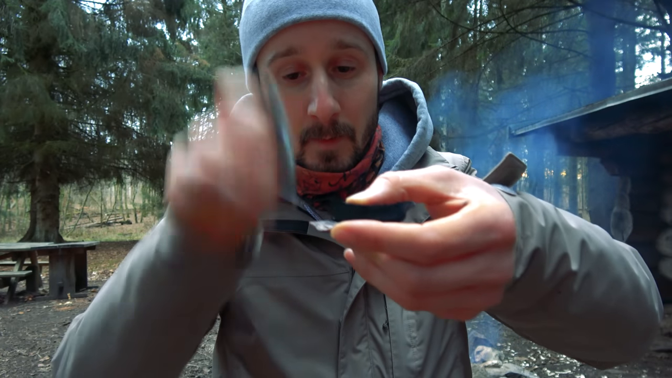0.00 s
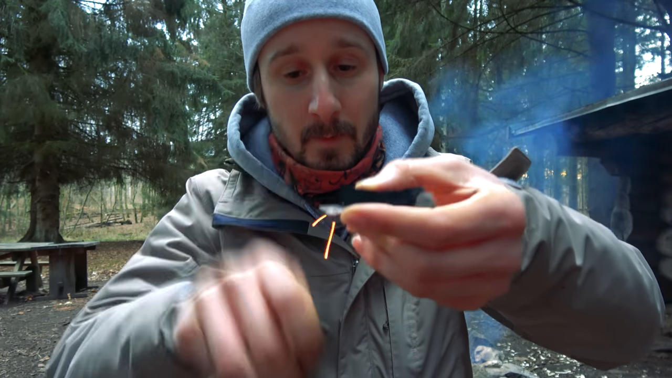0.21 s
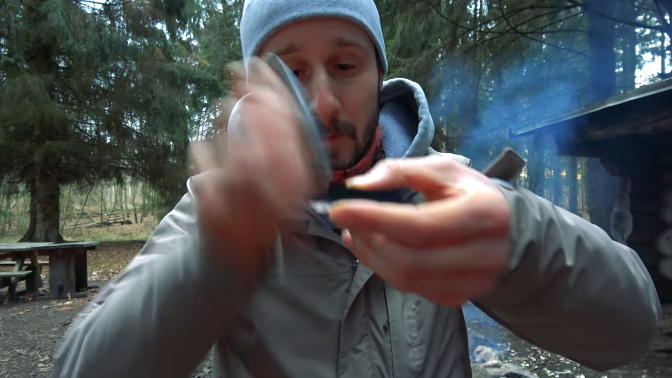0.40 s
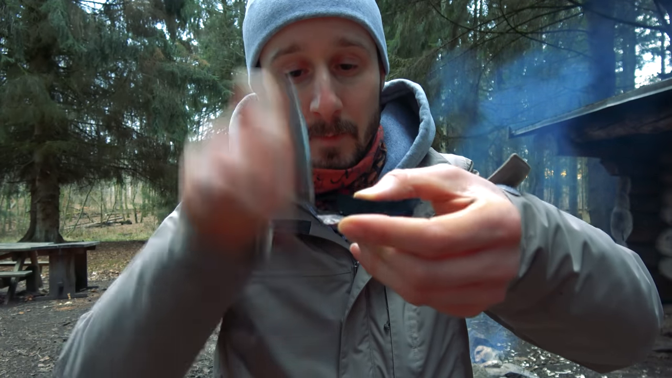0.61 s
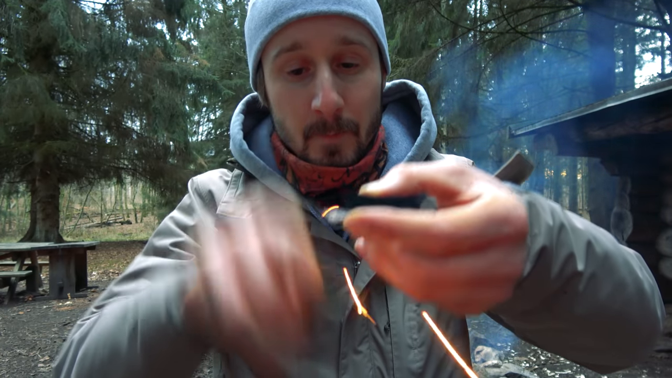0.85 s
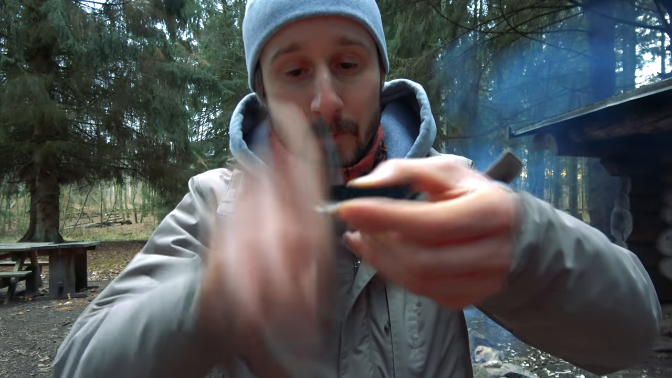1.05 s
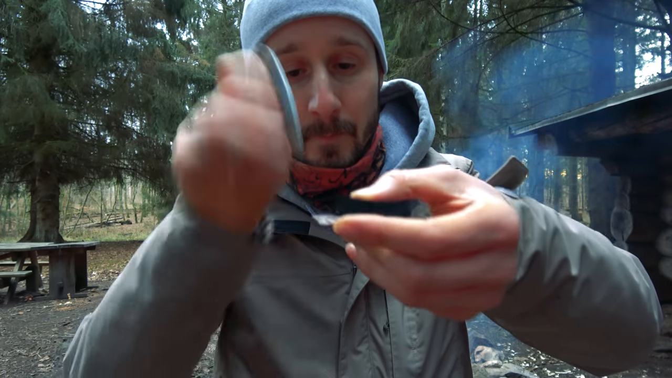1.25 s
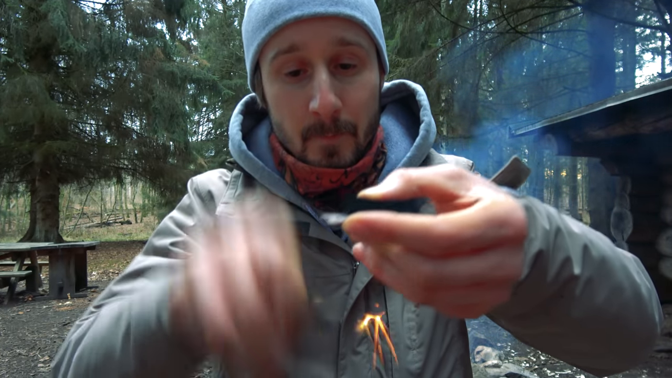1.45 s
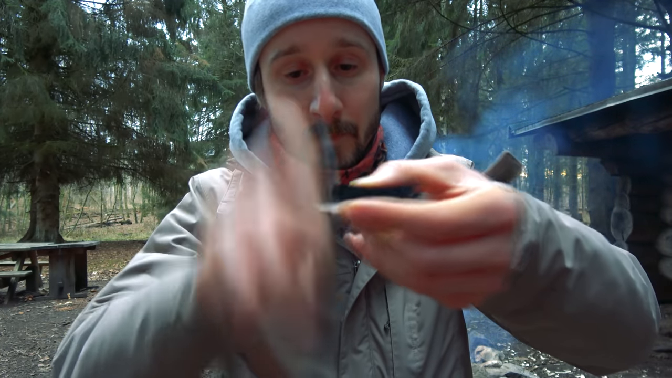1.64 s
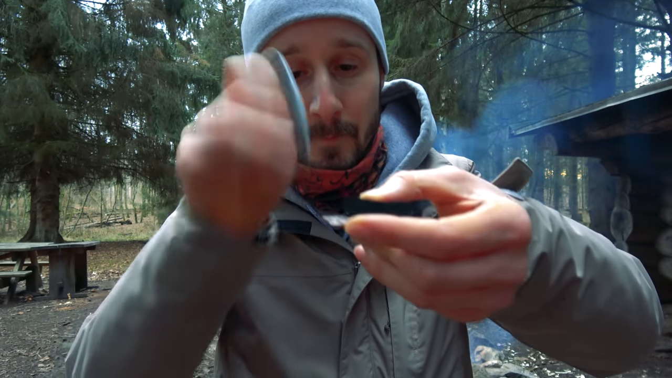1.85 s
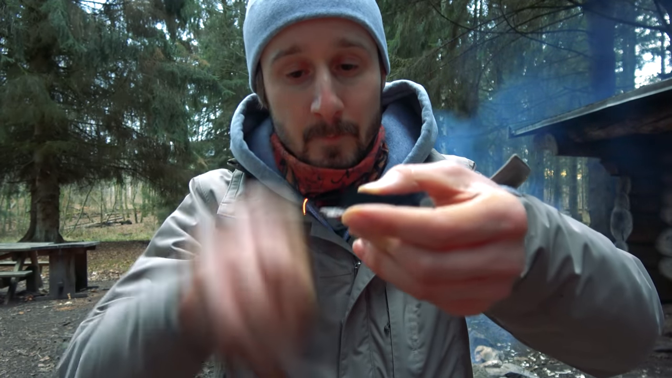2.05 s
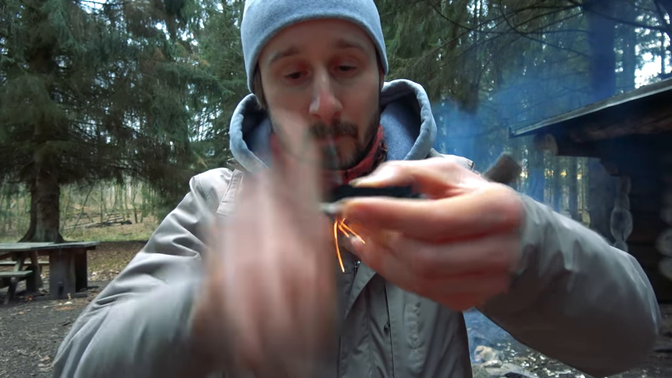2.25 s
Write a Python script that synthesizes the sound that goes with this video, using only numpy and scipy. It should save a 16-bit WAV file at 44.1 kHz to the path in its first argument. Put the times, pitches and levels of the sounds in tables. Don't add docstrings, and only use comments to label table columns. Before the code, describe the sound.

Close, dry, loud metal-on-stone strikes, about three per second, each a sharp knock running into a very short bright scrape; faint cloth swishes, light ticks, low wind on the microphone and soft forest hush behind.

```python
import sys
import numpy as np
from scipy import signal
from scipy.fft import rfft, irfft
from scipy.io import wavfile

SR = 44100
rng = np.random.default_rng(int(sys.argv[2]) if len(sys.argv) > 2 else 0)


def to_wav(s):
    ch = np.atleast_2d(s).T
    pcm = np.round(np.clip(ch, -1, 1) * 32767)
    wavfile.write(sys.argv[1], SR, pcm.astype(np.int16))


def linear_from_db(decibels):
    return 10 ** (np.asarray(decibels, float) / 20)


N = 101430


def rms_one(x):
    return x / np.sqrt(np.mean(x ** 2) + 1e-20)


def drift(rate_hz):
    pole = np.exp(-2 * np.pi * rate_hz / SR)
    walk = signal.lfilter([1], [1, -2 * pole, pole * pole], rng.standard_normal(N + SR))
    return rms_one(walk[SR:])


def ring(force, hz, t60_s):
    radius, angle = linear_from_db(-60 / (t60_s * SR)), 2 * np.pi * hz / SR
    return signal.lfilter([0, np.sin(angle)], [1, -2 * radius * np.cos(angle), radius * radius], force + 1e-18)


def coloured(spectrum):
    hz, db = np.transpose(spectrum)
    f = np.maximum(np.arange(N // 2 + 1) * SR / N, 1)
    gain = linear_from_db(np.interp(np.log(f), np.log(hz), db)) * np.minimum(f / hz[0], 1) ** 2
    return rms_one(irfft(rfft(rng.standard_normal(N)) * gain, N))


def band(x, order, low_hz, high_hz):
    return signal.sosfilt(signal.butter(order, [low_hz, high_hz], "band", fs=SR, output="sos"), x)


def impulses(times_s, gains):
    out = np.zeros(N)
    out[(np.asarray(times_s) * SR).astype(int)] = gains
    return out


def burst(t, start_s, fall_s, rise_s):
    return np.exp(np.where(t < start_s, (t - start_s) / rise_s, (start_s - t) / fall_s))


def swells(rows):
    t = np.arange(N) / SR
    return sum(linear_from_db(db) * np.exp(-((t - s) / half_s) ** 2) for s, half_s, db in rows)


# [pitch_hz, level_db per Hz]
HUSH_SPECTRUM = [(59, -30), (100, 3), (244, 0), (452, -6.5), (1010, -8), (2750, -19.5), (8110, -22),
                 (12700, -32), (16000, -30.5)]


def wood_hush():
    return linear_from_db(-51) * coloured(HUSH_SPECTRUM)


def wind():
    rumble = rms_one(band(rng.standard_normal(N), 2, 18, 124))
    return linear_from_db(-53.5 + 2.5 * drift(3.5)) * rumble


# [pitch_hz, level_db per Hz]
CLOTH_SPECTRUM = [(800, -4), (2500, 5), (5000, -0.5), (8400, 4), (9800, -8.5), (16000, 2)]
# [centre_s, half_length_s, level_db]
SLEEVE_SWISHES = [(.03, .015, -52.5), (.075, 0.012, -55.5), (.12, .02, -55.5), (.39, 0.034, -59),
                  (.455, 0.013, -51.5), (.97, 0.01, -54), (1.01, 0.016, -53.5), (1.07, .025, -59),
                  (1.35, .04, -62), (1.55, .012, -48.5), (1.95, .04, -61.5), (2.09, 0.005, -61),
                  (2.23, 0.022, -53)]


def jacket():
    patches = linear_from_db(2.5 * drift(60))
    return (linear_from_db(-71.5) + swells(SLEEVE_SWISHES)) * patches * coloured(CLOTH_SPECTRUM)


# [start_s, level_db, pitch_hz, decay_s]
CHIP_TICKS = [(0.0253, -30.5, 1600, 0.0018), (0.3295, -43, 2980, 0.0011), (0.38, -49, 8000, 0.0027),
              (0.392, -35, 2300, 0.0013), (0.6975, -38, 8500, 0.00043), (0.8116, -26, 502, 0.0026),
              (0.8177, -39.5, 3000, .001), (0.957, -47.5, 11000, 0.0014), (0.974, -49.5, 8000, 0.0013),
              (1, -35, 4800, 0.00058), (1.014, -40, 5980, 0.00067), (1.056, -48, 8000, 0.0026),
              (1.0884, -49, 6000, 0.0015), (1.548, -35, 2600, .003), (2.055, -30, 1985, 0.0004),
              (2.0895, -39, 2000, 0.0018), (2.1817, -23, 1320, 0.0022), (2.229, -50, 2500, 0.0073)]


def ticks():
    out, age = np.zeros(N + SR), np.arange(SR // 20) / SR
    spits = rng.standard_normal((len(CHIP_TICKS), len(age)))
    for (s, db, hz, decay_s), noise in zip(CHIP_TICKS, spits):
        noise = np.r_[-linear_from_db(12), noise[1:]]
        tone = rms_one(signal.lfilter(*signal.iirpeak(hz, 1.3, fs=SR), noise))
        out[int(s * SR):][:len(age)] += linear_from_db(db) * (tone + linear_from_db(-11) * noise) * np.exp(-age / decay_s)
    return out[:N]


STRIKE_TIMES = [.2158, .5179, .8223, 1.1212, 1.4209, 1.7230, 2.0198]
SCRAPE_LENGTHS = [.0255, .0215, .021, .0247, .0245, .0225, .0195]
# [knock_db, thud_db, scrape_db, knock_tilt_db per octave]
STROKE_LEVELS = [
    (-4.5, -10.5, -21, 4.5),
    (-8, -7, -22.5, -0.5),
    (-1, -6.5, -22.5, 4),
    (-4, -8, -21, 1),
    (-6.5, -8, -24, -1.5),
    (-13, -1.5, -22, -5),
    (-8, -6.5, -21, 0.5),
]
# [start_s, knock_db, tilt_db per octave]
UPWARD_BRUSH = (.6523, -20, -.8)
# [peak_s, level_db, pitch_hz]
EDGE_SNAGS = [(.2246, -9, 8000), (0.228, -12, 11000), (0.23, -10.5, 10000), (0.2326, -10, 10950),
              (.2381, -11, 9000), (0.238, -10, 8000), (0.5229, -6, 4070), (0.5268, -5.5, 9000),
              (.5305, -5.5, 11100), (0.5324, -10, 10000), (0.5384, -13, 11000), (0.541, -24, 2440),
              (0.8252, -11, 3500), (0.8298, -16, 6000), (0.8342, -15, 9000), (0.8415, -10, 4400),
              (1.1233, -5.5, 4000), (1.1298, -5.5, 5500), (1.1325, -16, 11000), (1.136, -7.5, 11000),
              (1.1444, -10, 3000), (1.4224, -13.5, 2600), (1.4268, -11.5, 12000), (1.4293, -2.5, 10800),
              (1.4444, -17, 1970), (1.7436, -13, 11040), (2.0243, -4, 4000), (0.2175, -9, 10940),
              (2.0363, -9.5, 3840), (2.0393, -26, 8000)]
# [pitch_hz, level_db, t60_s]
CONTACT_MODES = [(4047, 0, 0.0053), (4633, -3.5, 0.01), (5290, -3, .004), (7000, -3.5, .006),
                 (7246, -1.5, 0.0037), (7896, -2, 0.0054), (10710, -1, 0.0074), (11630, -4, 0.0048),
                 (12060, -7, 0.0065), (12450, -4.5, .004), (14880, -4, 0.0033), (15300, -9.5, .003),
                 (281, -18.5, 0.014), (520, -17, 0.0047), (770, -18.5, 0.018), (1138, -23, 0.0027),
               (1607, -3.5, 0.0068), (1953, -2.5, 0.009), (2710, -3, 0.0086), (3110, -4, 0.0099),
               (3640, -8.5, 0.0034), (6530, -7.5, 0.0027), (9000, -11, 0.0034)]


def scrape_envelope(t):
    force = np.zeros(N)
    for s, length_s, (_, _, db, _) in zip(STRIKE_TIMES, SCRAPE_LENGTHS, STROKE_LEVELS):
        landing = np.clip((t - s) / 0.0033, 0, 1)
        lift = np.exp(-np.maximum(t - s - length_s, 0) / 0.00091)
        force += linear_from_db(db) * landing * lift
    return force


def grit_impulses():
    met = rng.random(N) < 15000 / SR
    strength = linear_from_db(0.95 * np.minimum(rng.exponential(1, N), 4))
    return rms_one(met * strength * rng.choice([-1, 1], N))


def contacts():
    t = np.arange(N) / SR
    knocks = [(s, db, tilt) for s, (db, _, _, tilt) in zip(STRIKE_TIMES, STROKE_LEVELS)] + [UPWARD_BRUSH]
    scrape, grit, rub = scrape_envelope(t), grit_impulses(), rng.standard_normal(N)
    rub[[int(np.ceil(s * SR)) for s, _, _ in knocks]] = -linear_from_db(12)
    blows = np.array([burst(t, s, 0.00055, 1e-6) for s, _, _ in knocks])
    catches = np.array([burst(t, s, 0.00078, 0.00039) for s, _, _ in EDGE_SNAGS])
    _, knock_db, tilt_db = np.transpose(knocks)
    _, snag_db, snag_hz = np.transpose(EDGE_SNAGS)

    def drive(hz):
        octaves = np.log2(max(hz, 1500) / 5000)
        hits = linear_from_db(knock_db + tilt_db * octaves) @ blows
        hits = hits + linear_from_db(snag_db - 9 * np.log2(hz / snag_hz) ** 2) @ catches
        return (hits * rub + scrape * grit * linear_from_db(2.4 * octaves)) * linear_from_db(2.58 * drift(150))

    body = np.zeros(N)
    for k, (hz, db, t60_s) in enumerate(CONTACT_MODES):
        body += (-1) ** k * linear_from_db(db) * ring(drive(hz), hz, t60_s)
    crack = signal.sosfilt(signal.butter(1, 1200, "high", fs=SR, output="sos"), drive(6000))
    return linear_from_db(-15.5) * body, crack


def thuds():
    u = np.arange(SR // 200) / SR / 0.00015 - 1
    thud_db = np.transpose(STROKE_LEVELS)[1]
    return np.convolve(impulses(STRIKE_TIMES, linear_from_db(thud_db)), u * np.exp(-u * u) * 2)[:N]


def clearing(x):
    t = np.arange(SR // 2) / SR
    near, far = rng.standard_normal((2, len(t)))
    far = band(far, 1, 500, 12000)
    tail = near * linear_from_db(-16.5 - 60 * t / 0.036) + far * linear_from_db(-30.5 - 60 * t / 0.21)
    return signal.fftconvolve(x, tail * np.clip(t / 0.0029, 0, 1) * 0.064)[:N]


def puffs():
    age, peak_s = np.arange(SR // 5) / SR, .011
    luck = rng.standard_normal((len(STRIKE_TIMES), 2))
    hz = 28 + (62 - 28) * np.exp(-age / .012)
    swing = np.sin(2 * np.pi * np.cumsum(hz) / SR) * age / peak_s * np.exp(1 - age / peak_s)
    arrival_s = np.array(STRIKE_TIMES) + .026 + .0015 * luck[:, 0]
    return signal.fftconvolve(impulses(arrival_s, linear_from_db(-36.5 + 1.5 * luck[:, 1])), swing)[:N]


# [centre_s, half_length_s, level_db]
AIR_BUFFETS = [
    (.81, 0.05, -44),
    (1.66, 0.082, -47),
    (1.82, 0.034, -54),
    (1.97, 0.049, -56),
]


def buffets():
    return swells(AIR_BUFFETS) * rms_one(band(rng.standard_normal(N), 2, 18, 300))


def scene():
    air = wood_hush() + wind() + jacket() + buffets()
    body, crack = contacts()
    near = body + thuds() + ticks()
    echoes = clearing(near + linear_from_db(-4) * crack)
    return (near + linear_from_db(-18.5) * crack + echoes + puffs() + air)[None]


def low_pass(x):
    return signal.sosfilt(signal.butter(12, 17060, fs=SR, output="sos"), x)


def record(dry):
    cut = signal.sosfilt(signal.cheby2(10, 50, 16350, fs=SR, output="sos"), dry)
    mix = np.clip(cut, -1, 1)
    return low_pass(mix)


dry = scene()
out = record(dry)
to_wav(out)
```